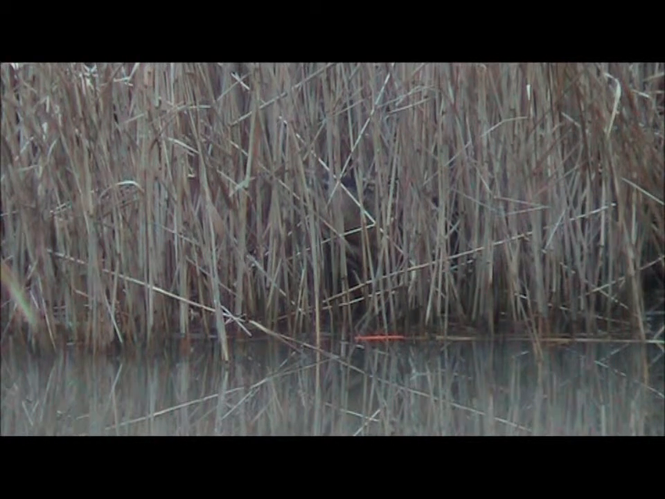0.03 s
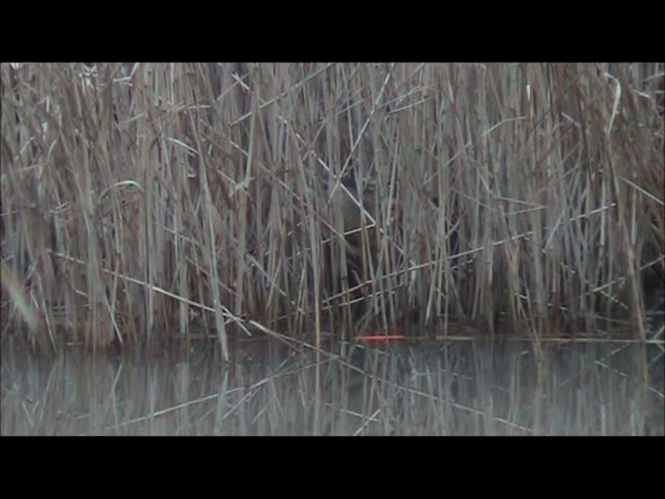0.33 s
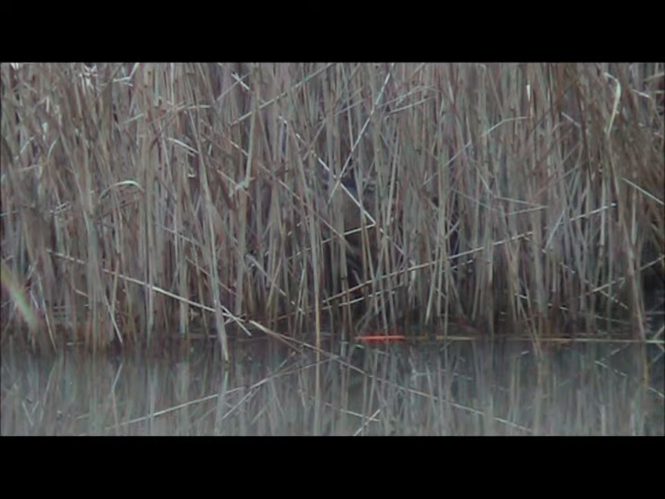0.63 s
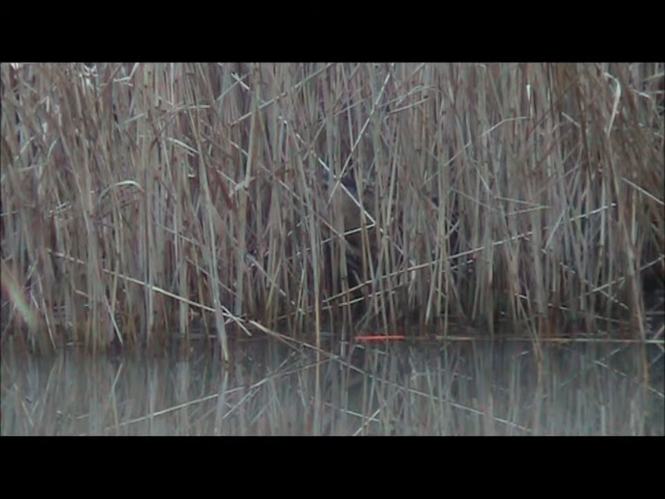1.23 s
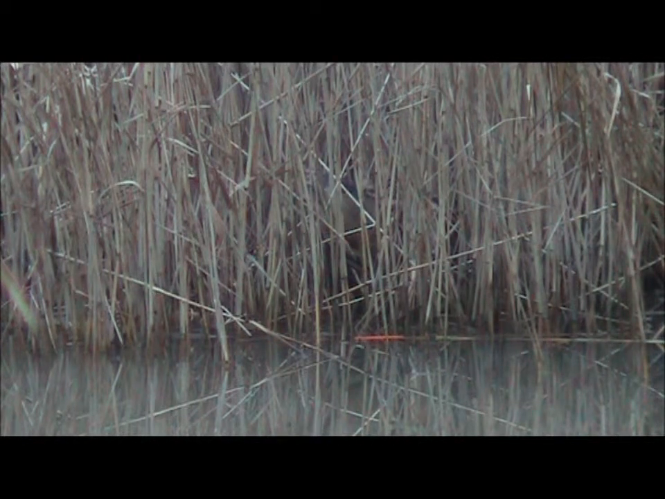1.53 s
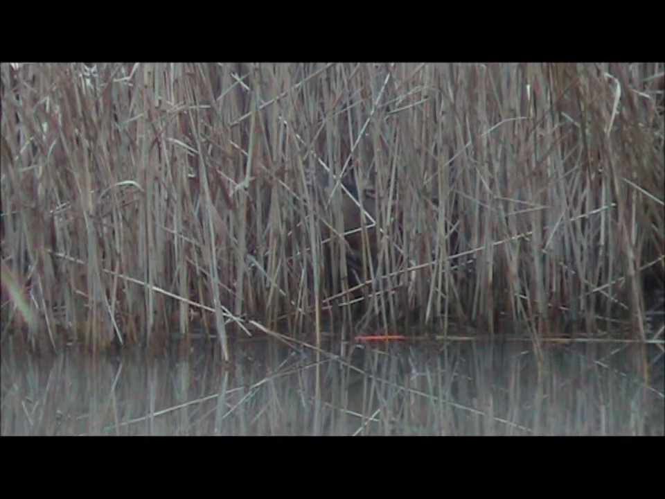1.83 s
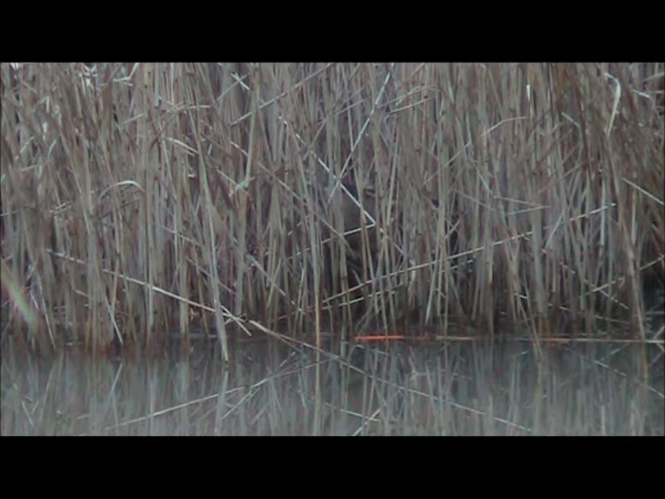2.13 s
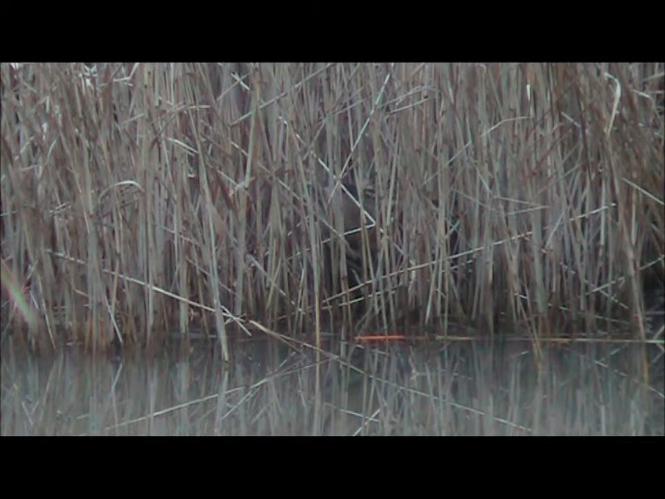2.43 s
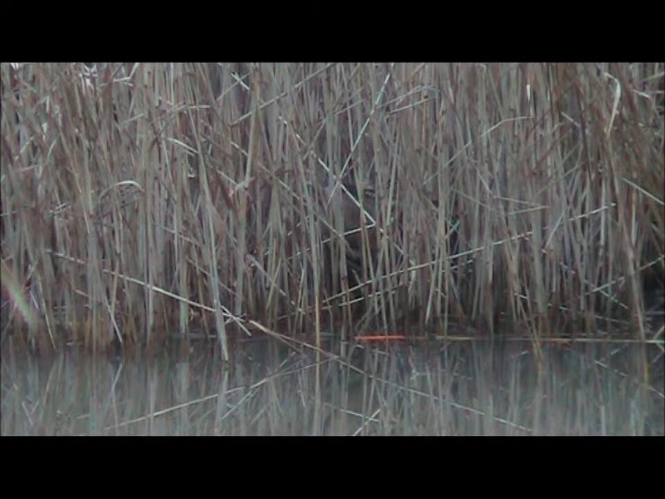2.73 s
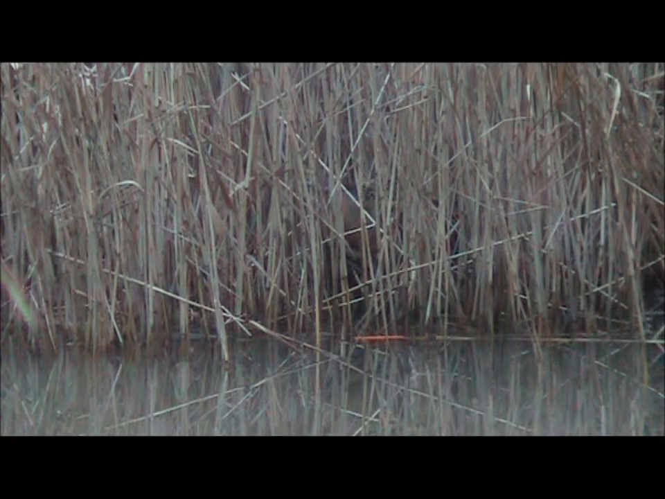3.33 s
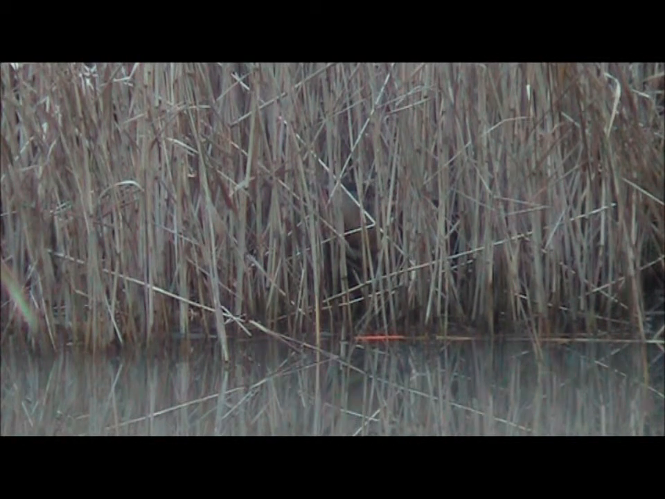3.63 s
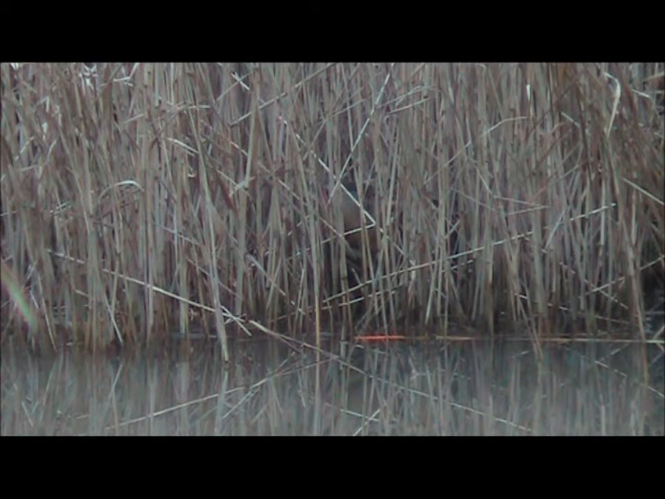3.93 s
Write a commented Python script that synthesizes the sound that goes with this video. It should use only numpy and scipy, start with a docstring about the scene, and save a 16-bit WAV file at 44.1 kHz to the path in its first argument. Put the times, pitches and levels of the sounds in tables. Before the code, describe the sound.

A small songbird sings quick chirps and a short trill over a faint distant rumble.

```python
"""A small songbird in a reed bed sings slurred notes, a quick trill and a buzzy flourish.
Fainter song follows from the right; thin high calls and a hoarse far-off bird come from the marsh.
Song notes are gliding, nearly pure whistles scattered by the reeds; hoarse calls are noise swells.
A distant engine drones and sinks in pitch with its firing rate, over low rumble and faint hiss."""
import sys
import numpy as np
from scipy import signal
from scipy.fft import rfft, irfft
from scipy.io import wavfile

SR = 44100
rng = np.random.default_rng(int(sys.argv[2]) if len(sys.argv) > 2 else 0)


def log_audio(samples):
    """Write samples as a 16-bit WAV file to the path given in sys.argv[1]."""
    # one column per channel
    frames = np.atleast_2d(samples).T
    # limit to full scale, then quantise
    limited = np.clip(frames, -1, 1)
    pcm = np.round(limited * 32767).astype(np.int16)
    wavfile.write(sys.argv[1], SR, pcm)


N = 176400


def from_db(db):
    """Decibels to gain."""
    return 10 ** (np.asarray(db) / 20)


def rms_one(x):
    """Scale to rms 1."""
    return x / np.sqrt(np.mean(x ** 2) + 1e-20)


def in_time(rows):
    """Interpolate each column after t/s linearly, per sample."""
    s, *columns = np.transpose(rows)
    return [np.interp(np.arange(N) / SR, s, c) for c in columns]


def at_hz(points, hz):
    """Interpolate on a log-frequency axis."""
    f, value = np.transpose(points)
    return np.interp(np.log(np.maximum(hz, 1)), np.log(f), value)


def drift(hz):
    """Low-passed noise, rms 1."""
    lowpass = signal.butter(2, hz, fs=SR, output="sos")
    return rms_one(signal.sosfilt(lowpass, rng.standard_normal(N + SR))[SR:])


def pan(db):
    """Stereo gains; db is left over right."""
    return from_db(np.array([[db], [-db]]) / 2)


def noise_pair(correlation):
    """Stereo white noise; left-right correlation is a scalar or per bin."""
    mid, side = rfft(rng.standard_normal((2, N)))
    c = np.clip(correlation, -.99, .99)
    return rms_one(irfft(np.sqrt(1 + c) * mid + np.sqrt(1 - c) * side * [[1], [-1]], N))


def band(x, hz, width_hz):
    """Band-pass to rms 1."""
    edges_hz = [hz - width_hz / 2, hz + width_hz / 2]
    return rms_one(signal.sosfilt(signal.butter(2, edges_hz, "band", fs=SR, output="sos"), x))


def air():
    """Far traffic rumble and an even hiss, wide in the treble."""
    # f/Hz, relative density/dB
    spectrum = [(22, -20), (45, -4.5), (80, -8.5), (150, -0.5), (250, -8.5), (400, -15.5), (600, -19),
                (850, -16.5), (1200, -21), (1700, -20.5), (2500, -25.5), (7000, -35), (15000, -43.5)]
    # f/Hz, left-right correlation
    correlation = [(150, 0.82), (300, 0.69), (600, -0.25), (1200, 0.36), (3000, -0.26)]
    hz = np.fft.rfftfreq(N, 1 / SR)
    white = rfft(noise_pair(at_hz(correlation, hz)))
    highpass = hz / np.hypot(hz, 20)
    return from_db(-51) * rms_one(irfft(white * from_db(at_hz(spectrum, hz)) * highpass, N))


def engine():
    """Engine orders grow louder as the engine draws nearer, with a steady-pitched drone and deep rumble."""
    # t/s, firing rate/Hz, level/dB
    firing = [(0, 99.53, -54), (1.35, 98.8, -49), (2.2, 94.83, -49), (2.55, 91.26, -48.5),
              (3.05, 90.37, -48.5), (3.45, 85.6, -46.5), (4, 83.04, -46.5)]
    # multiple of firing rate, gain/dB
    orders = [(.5, -19), (1, 1.5), (1.5, -13.5), (2.5, -16), (3.5, -25), (4.5, -26.5)]
    # t/s, level/dB
    drone_levels = [(0, -65.5), (2.3, -62), (3.099, -55), (4, -58)]
    # t/s, level/dB
    rumble_levels = [(0, -48.5), (.6, -53.5), (2.2, -55.5)]
    drone_hz = 208.3
    firing_hz, db = in_time(firing)
    phase = 2 * np.pi * np.cumsum(firing_hz) / SR
    tones = 0
    for multiple, order_db in orders:
        depth = .08 if order_db > -5 else .5  # weak orders waver more
        in_phase = (1 + depth * drift(5.5)) * np.sin(multiple * phase)
        quadrature = depth * drift(2.36) * np.cos(multiple * phase)
        tones += np.sqrt(2) * from_db(db + order_db) * (in_phase + quadrature)
    drone_gain = np.sqrt(2) * from_db(in_time(drone_levels)[0] + 2.66 * drift(7.5))
    drone = drone_gain * np.sin(2 * np.pi * drone_hz * np.arange(N) / SR + .56 * drift(3.3))
    low_noise = band(rng.standard_normal(N + SR), hz=55.6, width_hz=21)[SR:]
    rumble = from_db(in_time(rumble_levels)[0]) * low_noise
    return (tones + drone + rumble) * pan(db=1.3)


def far_caws():
    """Of each hoarse call only the throat resonance arrives, as a soft swell."""
    # peak t/s, level/dB
    caws = [(.40, -68), (1.15, -59), (1.85, -59), (2.62, -62.5), (3.13, -63.5)]
    rise_s, fall_s = .13, .16
    t = np.arange(N) / SR
    swells = sum(from_db(db) * np.exp(-.5 * ((t - s) / np.where(t < s, rise_s, fall_s)) ** 2)
                 for s, db in caws)
    return swells * band(noise_pair(correlation=.53), hz=1510, width_hz=500) * pan(db=-2)


def reeds(x):
    """Near stems blur each note, the reed bed echoes it, a fainter tail returns across the marsh."""
    stems_t60_s, bed_t60_s, marsh_t60_s = .035, .32, 1.15
    stems_db, marsh_db = 10, -8.5  # re reed bed
    t = np.arange(N) / SR
    decay = (from_db(stems_db - 60 * t / stems_t60_s) + from_db(-60 * t / bed_t60_s)
             + from_db(marsh_db - 60 * t / marsh_t60_s))
    echoes = noise_pair(correlation=.6) * decay / np.sqrt(np.sum(decay ** 2))
    return signal.fftconvolve(x[None], echoes[:, :SR], axes=1)[:, :N]


def slur(s, length_s, start_hz, middle_hz, end_hz, db, swell_db, swing_hz=0, swing_rate_hz=0):
    """A note bends through three pitches and swells or fades; a buzz adds a dying pitch swing."""
    t = np.arange(int(length_s * SR)) / SR
    u = t / length_s
    glide_hz = np.polyval(np.polyfit([0, .5, 1], [start_hz, middle_hz, end_hz], 2), u)
    buzz_hz = swing_hz * np.cos(np.pi / 2 * u) ** 2 * np.sin(2 * np.pi * swing_rate_hz * t)
    return s, glide_hz + buzz_hz, db + swell_db * (u - .5)


def downsweep(s, length_s, db):
    """One steep falling note of the trill."""
    # share of length, f/Hz, gain/dB
    contour = [(0, 4830, -23), (.16, 4110, -1), (.3, 3510, -13), (.48, 3236, -2), (.7, 3020, -1.5),
               (1, 2480, -8)]
    share, hz, gain_db = np.transpose(contour)
    u = np.linspace(0, 1, int(length_s * SR))
    return s, np.interp(u, share, hz), db + np.interp(u, share, gain_db)


def songbird(notes, pan_db, left_lag_s, scatter_db, waver_share=.016):
    """Nearly pure, wavering whistles, heard directly and through the reeds."""
    attack_s, release_s, waver_hz, flutter_db = .0025, .0022, 255, 1.5
    voice, waver, flutter = np.zeros(N + SR), drift(waver_hz), drift(waver_hz)
    for s, hz, db in notes:
        t = np.arange(len(hz)) / SR
        at = int(s * SR) + np.arange(len(hz))
        attack = np.sin(np.pi / 2 * np.clip(t / attack_s, 0, 1))
        release = np.sin(np.pi / 2 * np.clip((t[-1] - t) / release_s, 0, 1))
        gain = np.sqrt(2) * from_db(db + flutter_db * flutter[at % N])
        phase = 2 * np.pi * np.cumsum(hz * (1 + waver_share * waver[at % N])) / SR
        voice[at] += attack * release * gain * np.sin(phase)
    voice = voice[:N]
    delay = np.exp(-2j * np.pi * np.fft.rfftfreq(N, 1 / SR) * left_lag_s)
    left = irfft(rfft(voice) * delay, N)
    return pan(pan_db) * np.array([left, voice]) + from_db(scatter_db) * reeds(voice)


def high_calls():
    """Other birds: thin, mostly high calls, a buzz, and twitters of three tiny random slurs."""
    # t/s, length/s, start f/Hz, middle f/Hz, end f/Hz, level/dB, swell/dB
    slurs = [ (.052, .034, 4220, 4630, 4500, -72, -5), (.241, 0.053, 6750, 6290, 5630, -60, 1),
             (1.375, 0.044, 7100, 6900, 6960, -72, 2), (1.413, .040, 7650, 7140, 7130, -69, 2),
             (1.454, 0.035, 8150, 7200, 7100, -69.5, -1), (1.475, 0.027, 5950, 5350, 4850, -64, 0),
             (1.490, 0.033, 2350, 2000, 1670, -61.5, 3), (1.490, .036, 8200, 7690, 7550, -68.5, 2),
             (3.88, 0.15, 8320, 8180, 8260, -79.5, 7)]
    # as slurs, then swing/Hz, swing rate/Hz
    buzzes = [(0.058, 0.062, 6640, 6440, 5440, -58.5, -1, 430, 193)]
    # t/s, f/Hz, level/dB
    twitters = [(0.851, 4540, -68), (.96, 5700, -73), (2.84, 5700, -72), (2.951, 5760, -72),
                (3.07, 5050, -73), (3.24, 4750, -72), (3.56, 5500, -72)]
    step_s, bend_share = .014, .092
    notes = [slur(*row) for row in slurs + buzzes]
    for s, hz, db in twitters:
        for k in range(3):
            pitches_hz = hz * (1 + bend_share * rng.uniform(-.76, 1, size=3))
            notes.append(slur(s + k * step_s, step_s, *pitches_hz, db, swell_db=0))
    return songbird(notes, pan_db=1.6, left_lag_s=-23e-6, scatter_db=-4.5, waver_share=.0053)


def far_song():
    """Fainter slurred whistles from the right."""
    # t/s, length/s, start f/Hz, middle f/Hz, end f/Hz, level/dB, swell/dB
    slurs = [ (3.124, 0.037, 3040, 3100, 3610, -59.5, 11), (3.260, 0.016, 3220, 3850, 4660, -66, 1),
             (3.288, 0.021, 3370, 3270, 2860, -60, 2), (3.319, 0.0095, 4400, 3570, 2900, -59.5, 0),
             (3.427, 0.019, 3220, 3490, 4620, -60, -4), (3.457, 0.021, 3470, 2960, 3030, -62, -3),
             (3.478, 0.021, 3250, 3170, 3800, -55.5, -7), (3.586, 0.018, 3640, 3950, 4000, -59.5, 0),
             (3.613, 0.025, 3590, 3310, 2880, -55.5, -2), (3.641, 0.012, 4370, 3270, 2700, -58, -5),
             (3.742, 0.036, 3180, 4240, 3080, -62, 0), (3.774, 0.032, 2885, 2860, 2980, -55.5, 8),
             (3.800, 0.016, 2860, 3240, 3440, -53.5, 3), (3.812, 0.011, 3370, 2910, 2950, -57, -3),
             (3.887, 0.018, 4200, 3370, 2830, -54, 8), (3.948, 0.018, 3630, 3000, 2430, -53, -4)]
    return songbird([slur(*row) for row in slurs], pan_db=-1.5, left_lag_s=35e-6, scatter_db=-9)


def near_song():
    """The near bird, centred: slurs, a trill of downsweeps, a buzzy flourish."""
    # t/s, length/s, start f/Hz, middle f/Hz, end f/Hz, level/dB, swell/dB
    slurs = [ (1.099, .040, 5670, 4870, 4460, -59, 19.5), (1.138, 0.0054, 4170, 3350, 4730, -55, 8),
             (1.145, 0.014, 4940, 5500, 5560, -62.5, -7), (1.231, 0.007, 6300, 5160, 4250, -56, 10),
             (1.245, 0.034, 5550, 5430, 5000, -60, -8), (1.269, 0.013, 4860, 3990, 2860, -55, -8),
             (1.281, 0.013, 4200, 5600, 5800, -59.5, -2), (1.373, .008, 6740, 5600, 5500, -56, 0),
             (1.381, 0.031, 5800, 5430, 5000, -54.5, -2), (1.409, 0.008, 5100, 4330, 4280, -49.5, 6),
             (1.496, 0.0084, 2400, 4100, 5000, -54.5, 21), (1.527, 0.031, 3840, 3830, 4150, -51.5, 14),
             (1.556, 0.015, 4220, 4450, 4200, -51.5, -3), (1.618, 0.015, 4700, 4420, 4600, -52, 2),
             (1.634, .011, 3880, 4060, 4400, -49, 2), (1.644, 0.02, 4600, 5020, 3980, -55, 6),
             (1.673, 0.012, 3180, 3390, 3930, -53, 4), (1.682, 0.021, 3150, 3420, 3600, -55.5, -3),
             (1.700, 0.079, 3447, 3476, 3520, -59.5, -13), (1.784, 0.018, 5470, 4650, 4200, -53, 21),
             (1.800, 0.019, 2660, 3800, 4700, -50.5, 11), (1.820, 0.005, 4740, 4550, 4240, -45, -2),
             (1.844, 0.044, 3250, 3650, 3710, -50.5, 0), (1.943, 0.0061, 4930, 4400, 4100, -45.5, 10),
             (1.950, 0.014, 2720, 3580, 4870, -48, 6), (1.988, 0.021, 3140, 3490, 3400, -52.5, 11),
             (2.010, 0.013, 3580, 3700, 4260, -47, 6), (2.069, 0.025, 4620, 4370, 4300, -55.5, 6),
             (2.090, 0.013, 2900, 3200, 3700, -55, 11), (2.102, 0.016, 3930, 4150, 3920, -43.5, -1),
             (2.120, 0.018, 4140, 3600, 2720, -50, 1), (2.180, 0.006, 4600, 3950, 4300, -51, 2),
             (2.248, 0.0059, 5870, 4680, 3750, -50.5, 4), (2.318, 0.0054, 4800, 4040, 3780, -48, 4),
             (2.394, 0.01, 4010, 4230, 3980, -46.5, 8), (2.462, 0.011, 4360, 3770, 3970, -51, -5),
             (2.594, 0.012, 2540, 4150, 4670, -49.5, 9), (2.612, 0.019, 5300, 4260, 3900, -53.5, 4),
             (2.632, 0.011, 3190, 3080, 3540, -52, -3), (2.644, 0.01, 3390, 3040, 3450, -46.5, -2)]
    # as slurs, then swing/Hz, swing rate/Hz
    buzzes = [(2.562, 0.029, 4320, 4470, 4600, -60, 4, 250, 95),
              (2.656, 0.0291, 3220, 2810, 2350, -48, -4, 300, 217)]
    # t/s, length/s, level/dB
    trill = [(2.192, 0.016, -41.5), (2.258, 0.017, -41), (2.327, 0.021, -40.5), (2.402, 0.02, -41.5),
             (2.4723, 0.023, -42)]
    notes = [slur(*row) for row in slurs + buzzes] + [downsweep(*row) for row in trill]
    return songbird(notes, pan_db=0, left_lag_s=5e-6, scatter_db=-5.5)


def scene():
    """Birds over the background of the marsh."""
    return near_song() + far_song() + high_calls() + far_caws() + engine() + air()


def record(dry):
    """Steep low-pass on the top treble."""
    cutoff_hz = 15300
    return signal.sosfilt(signal.ellip(10, .1, 80, cutoff_hz, fs=SR, output="sos"), dry)


dry = scene()
out = record(dry)
log_audio(out)
```